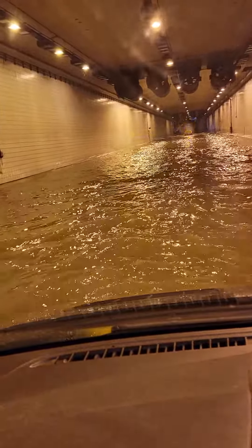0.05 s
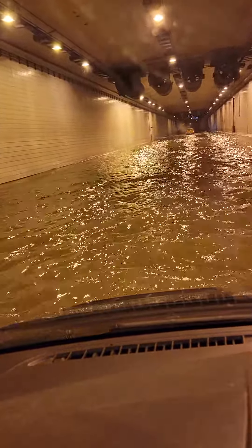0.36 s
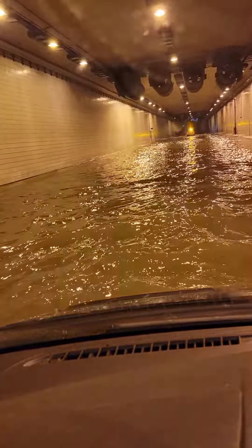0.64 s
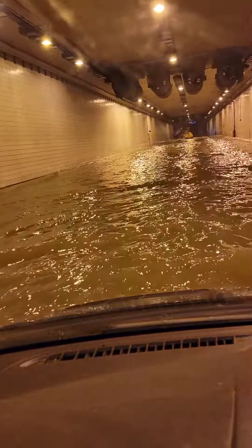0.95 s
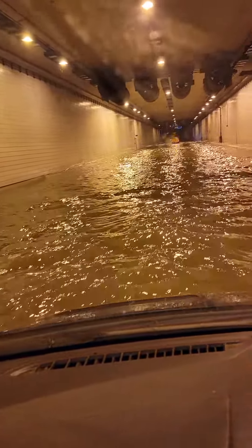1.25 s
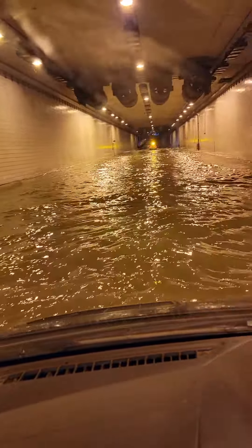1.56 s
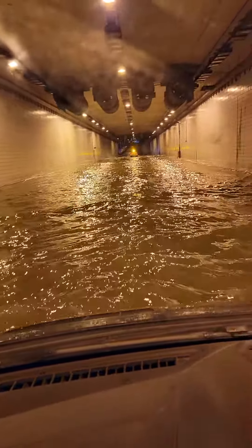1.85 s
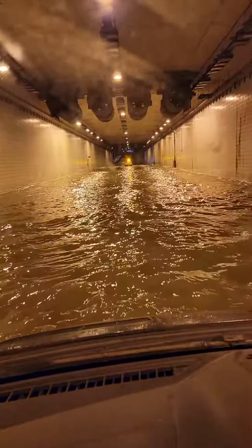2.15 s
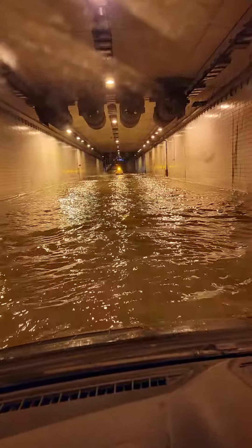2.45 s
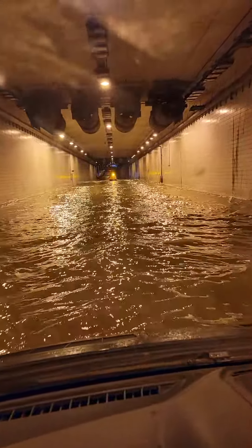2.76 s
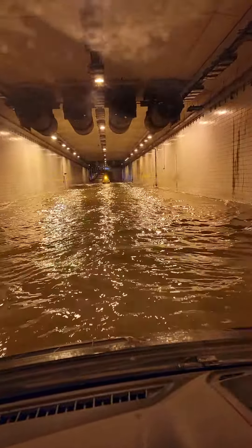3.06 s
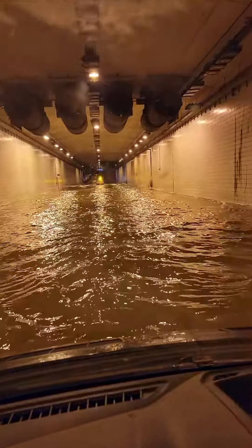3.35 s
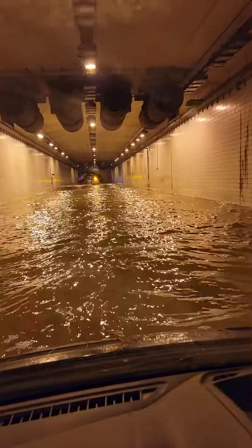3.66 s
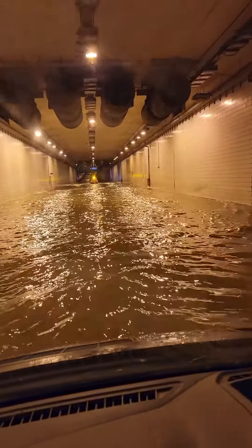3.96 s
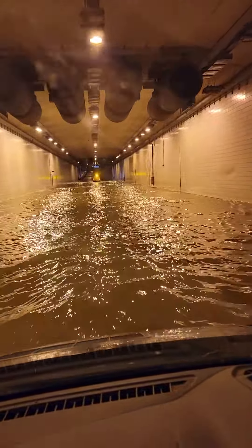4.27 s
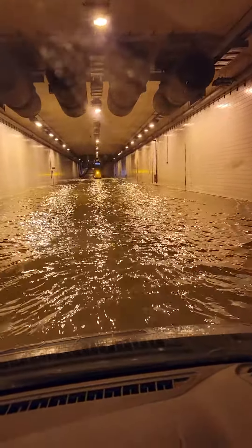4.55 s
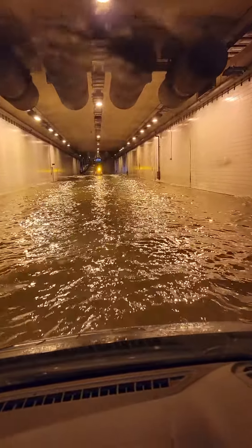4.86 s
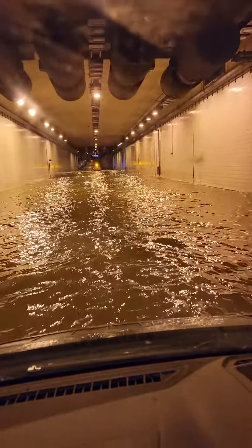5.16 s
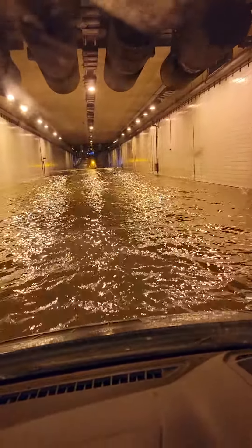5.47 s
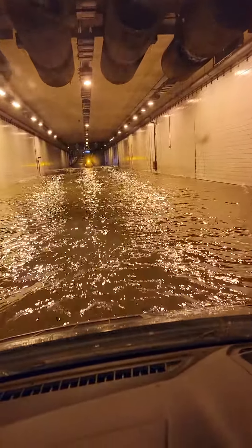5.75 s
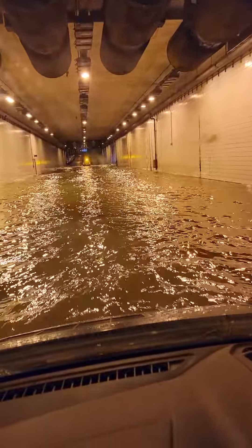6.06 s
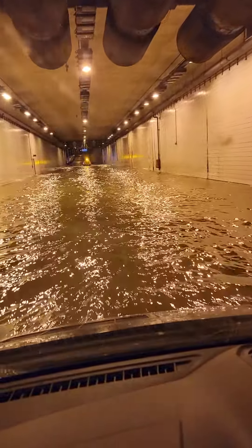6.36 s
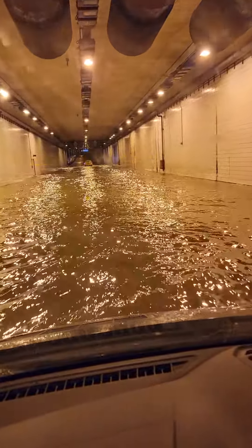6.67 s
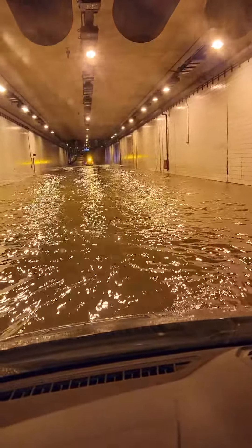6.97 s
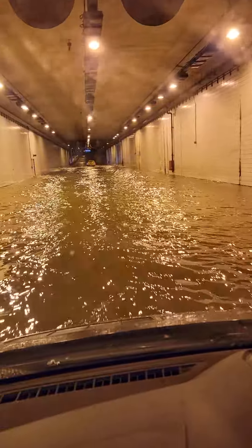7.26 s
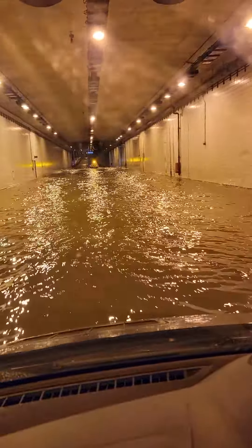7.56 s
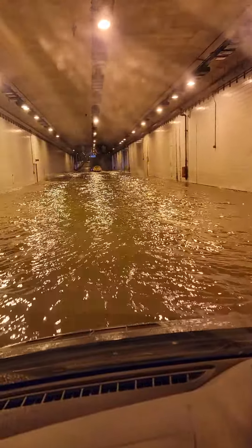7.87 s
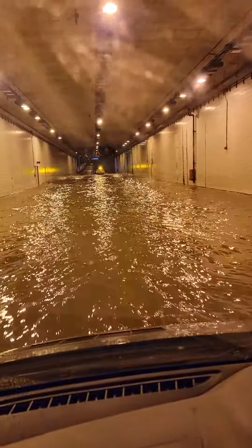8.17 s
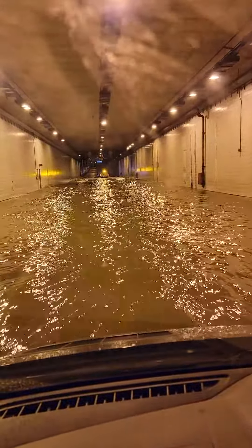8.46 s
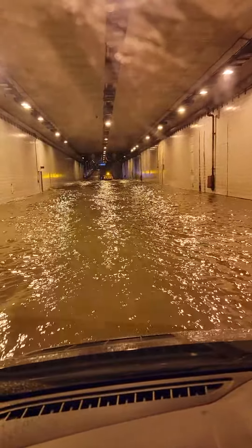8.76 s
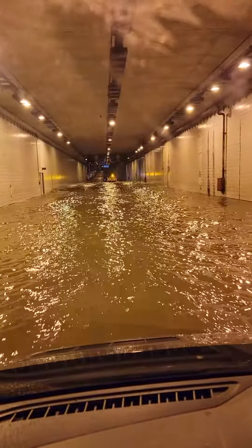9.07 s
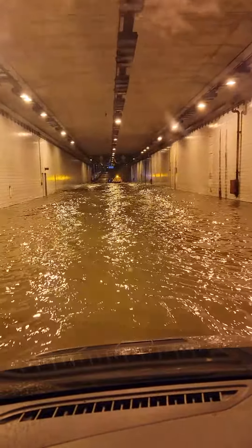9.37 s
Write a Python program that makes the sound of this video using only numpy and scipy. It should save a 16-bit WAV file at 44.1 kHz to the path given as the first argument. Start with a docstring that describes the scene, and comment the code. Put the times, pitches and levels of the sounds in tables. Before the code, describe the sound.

From inside a car wading slowly through a flooded tunnel, a deep engine boom runs for the whole nine and a half seconds. The revs climb slightly until about 3 seconds, hold, then ease a little after 6, while a low hum swells and fades. Water rumbles against the shell, churns under the floor and washes along the doors, building modestly by 4 seconds, with gentle surges near 1.8, 3, 4, 5.7, 8 and 8.8 seconds. The turn signal goes tick-tock in the dashboard throughout, one pair about every three quarters of a second. Close on the right, something rubs with a soft, airy swish, clearest around 4 seconds and again at the very end. Small crisp crackles cluster between 1 and 2 seconds and around 3.5, with single ones near 5 and 7. The cabin sounds close, enclosed and bass-heavy.

```python
"""A four-cylinder engine booms at low revs and picks up a little, heard inside a car wading slowly
through a flooded tunnel. Its firing tone and overtones swell as they pass through the cabin's modes.
Water shakes the shell, churns under the floor and washes along the doors, and the flasher relay
goes tick-tock in the dashboard. Close on the right something rubs softly, with a few crackles."""
import sys
import numpy as np
from scipy import signal
from scipy.fft import rfft, irfft, next_fast_len
from scipy.io import wavfile

SR = 44100
rng = np.random.default_rng(int(sys.argv[2]) if len(sys.argv) > 2 else 0)


def to_wav(s):
    """Save 16-bit WAV."""
    ch = np.atleast_2d(s).T  # columns
    pcm = np.round(np.clip(ch, -1, 1) * 32767)  # PCM
    wavfile.write(sys.argv[1], SR, pcm.astype(np.int16))


N = 415422
TIME = np.arange(N) / SR


def from_db(db):
    """Decibels to gain."""
    return 10 ** (np.asarray(db) / 20)


def rms_one(x):
    """Scale to unit power."""
    return x / np.sqrt(np.mean(x ** 2) + 1e-20)


def in_time(rows):
    """Each column of an automation curve at every sample."""
    times, *columns = np.transpose(rows)
    return [np.interp(TIME, times, column) for column in columns]


def at_hz(points, hz):
    """Read a curve on a log-frequency axis."""
    freqs, values = np.transpose(points)
    return np.interp(np.log(hz + 1e-9), np.log(freqs), values)


def pan(db):
    """Stereo gains for a pan in dB, left minus right."""
    return rms_one(from_db(np.array([[db], [-db]]) / 2))


def delayed(pair, lags_s):
    """Delay each side by its own time."""
    return np.array([np.pad(x, (int(lag * SR), 0))[:len(x)] for x, lag in zip(pair, lags_s)])


def hump(peak_s, half_s):
    """A smooth rise to 1 and a fall, with soft skirts."""
    return 1 / np.cosh(np.minimum(np.abs((TIME - peak_s) / half_s) * np.sqrt(2), 20))


def drift(rate_hz):
    """Slow random modulation of unit power."""
    hop = 40
    pole = np.exp(-2 * np.pi * rate_hz * hop / SR)
    noise = rng.standard_normal(N // hop + 2002)
    slow = signal.lfilter([1], [1, -2 * pole, pole * pole], noise)[2000:]
    return np.interp(np.arange(N) / hop, np.arange(len(slow)), rms_one(slow))


def ring(force, hz, t60):
    """A resonator: a unit click sets a sine of height 1 ringing."""
    radius, angle = from_db(-60 / (t60 * SR)), 2 * np.pi * hz / SR
    return signal.lfilter([0, np.sin(angle)], [1, -2 * radius * np.cos(angle), radius ** 2], force + 1e-18)


def mounted_ring(force, hz, t60):
    """A mode driven through a mount of the same tuning: it builds quickly to height 1, then dies."""
    return ring(ring(force, hz, t60), hz, t60) * 2 * np.e * np.log(1000) / (t60 * SR)


def hiss():
    """Two unrelated white noises."""
    return rng.standard_normal((2, N))


def grains(per_s, spread_db):
    """Two trains of random clicks, most small and a few large."""
    sizes = from_db(spread_db * np.minimum(rng.exponential(1, (2, N)), 4))
    signs = rng.choice([-1, 1], (2, N))
    return rms_one(sizes * signs * (rng.random((2, N)) < per_s / SR))


# Stereo width of the cabin: freq_hz, left_right_correlation
CABIN_CORRELATION = [(30, 0.73), (170, 1), (240, 0.85), (310, 0.42), (380, -0.012), (460, -0.15),
                     (550, -0.56), (660, -0.061), (780, -0.7), (950, -0.37), (1550, -0.54), (2000, -0.0055),
                     (2700, -0.14), (5000, 0.007)]
# Lean of the stereo image: freq_hz, pan_db
CABIN_BALANCE = [(40, -3), (90, -0.5), (160, 0), (260, 4), (350, 1.5), (550, -1), (1200, -2), (3000, -2),
                 (4500, -1), (6500, -6.5), (9000, 5.5), (14000, -5)]
def in_cabin(pair, eq):
    """Shape two unrelated signals into a unit-power stereo bed with the cabin's width and balance."""
    size, sides = next_fast_len(N), np.array([[1], [-1]])
    hz = np.arange(size // 2 + 1) * SR / size
    mid, side = rfft(pair, size) * from_db(at_hz(eq, hz))
    alike = np.clip(at_hz(CABIN_CORRELATION, hz), -1, 1)
    field = np.sqrt(1 + alike) * mid + np.sqrt(1 - alike) * side * sides
    field *= from_db(sides * at_hz(CABIN_BALANCE, hz) / 2)
    return rms_one(irfft(field, size)[:, :N])


# Bright, airy tone of the rub: freq_hz, gain_db
RUB_EQ = [(1500, -22), (3000, -5), (3900, 0), (4900, 1.5), (5830, 1.5), (5960, 7), (6080, 1.5), (6700, .5),
          (7500, -3.5), (8400, -8.5), (10500, -5), (12500, .5), (15000, 2), (16000, 1)]
# Light contact between strokes: time_s, relative_db
RESTING_CONTACT = [(0, -79), (1, -79), (4.5, -73), (9.42, -68.5)]
# Strokes that swell and fade: peak_s, relative_db, half_length_s
RUB_STROKES = [(1.158, -70, 0.036), (1.322, -66, 0.16), (1.665, -65, 0.13), (1.896, -57.5, 0.019),
               (2.714, -71, 0.15), (3.0, -71.5, 0.11), (3.5, -65, 0.054), (3.758, -62, 0.057),
               (3.88, -50.5, 0.091), (3.943, -48, 0.07), (4.09, -55.5, 0.083), (4.477, -65, 0.12),
               (4.654, -63, 0.11), (5.395, -58.5, 0.13), (5.787, -69, 0.11), (6.24, -67.5, 0.077),
               (6.596, -68.5, 0.18), (7.383, -63.5, 0.074), (7.867, -59, 0.09), (8.07, -65, 0.033),
               (9.276, -58, 0.086), (9.36, -51, 0.053)]
def rubbing(gain_db=8.0, grit=0.61, uneven_db=1.9):
    """Fine slips of a surface sliding close by make a swish that swells with each stroke."""
    slips = hiss() + grit * grains(1500, spread_db=2.5)
    power = from_db(in_time(RESTING_CONTACT)[0]) ** 2
    power += sum((from_db(db) * hump(peak_s, half_s)) ** 2 for peak_s, db, half_s in RUB_STROKES)
    envelope = np.sqrt(power) * from_db(gain_db + uneven_db * drift(12))
    return envelope * in_cabin(slips, RUB_EQ) * pan(-3.0)


# A crackle's crisp snap and the midrange body under it: freq_hz, gain_db
SNAP_EQ = [(800, -14), (2000, -7), (5500, 2.5), (7000, 2), (9000, -3), (12500, 1), (14500, -2), (16000, -6)]
BODY_EQ = [(600, -28), (1500, 6), (3000, -1.5), (4500, 0), (8000, -31)]
# Small close catches: start_s, level_db, twice_pan_db, body_over_snap_db
CATCHES = [(1.1195, -35.5, -1.5, -32), (1.311, -40, -9, -21), (1.6195, -41.5, -9, 12.5),
           (1.67, -39, -16, -15), (1.7, -47, -3, -20), (1.7409, -48, -17, -20), (1.7988, -39, -18, -11),
           (1.8255, -47, -10, -15), (1.8377, -47, -7, -12), (1.8776, -43, -9, -15), (1.899, -44, -17, 8),
           (2.1055, -42, -19, -20), (3.4018, -48, -15, 21.5), (3.412, -42, -10, -10), (3.428, -51, -9, -15),
           (3.5436, -51, -14, 15), (3.658, -43, -19, -32), (3.677, -37, -16, -8), (3.684, -40, -16, -2),
           (3.6985, -45, -14, -2), (3.7153, -35.5, -20, 8), (5.0335, -37, -2, -22), (7.0183, -40, -3, -25)]
def crackles(slips_per_s=300, slips_db=-8, slips_s=0.013, scratch=0.1, scratch_s=0.018):
    """The rubbing surface catches: a snap, a dying run of finer slips and a short scratch."""
    attack_s, decay_s = .00015, .0007
    snap, body, t = np.zeros((2, N)), np.zeros((2, N)), TIME[:SR // 25]
    for start_s, db, twice_pan_db, body_db in CATCHES:
        slips = (rng.random(len(t)) < slips_per_s / SR) * rng.random(len(t))
        slips *= from_db(slips_db) * np.exp(-t / slips_s)
        slips[0] = 1  # the opening snap
        shape = signal.lfilter([1], [1, -np.exp(-1 / (decay_s * SR))], slips)
        shape += scratch * np.exp(-t / scratch_s)
        burst = from_db(db) * shape * (1 - np.exp(-t / attack_s)) * pan(twice_pan_db / 2)
        start = int(start_s * SR)
        snap[:, start:start + len(t)] += burst
        body[:, start:start + len(t)] += from_db(body_db) * burst
    return snap * in_cabin(hiss(), SNAP_EQ) + body * in_cabin(hiss(), BODY_EQ)


# Early reflections off windscreen, roof and doors: left_delay_s, right_delay_s, relative_db
REFLECTIONS = [(.0085, .0073, -15), (.0105, .0098, -12), (.0166, .0135, -19), (.0225, .0213, -19),
               (.0271, .034, -24)]
def cabin_echoes(direct):
    """The cabin answers briefly, its upholstery soaking up the treble."""
    dull = signal.sosfilt(signal.butter(2, 2800, fs=SR, output="sos"), direct)
    return sum(from_db(db) * delayed(dull, lags_s) for *lags_s, db in REFLECTIONS)


# The relay pulls in (tick) and drops out (tock): start_s, relative_db
TICK_STROKES = [(.4358, -2), (1.1957, -3), (1.9432, -1.5), (2.7167, -3.5), (3.4631, -2.5), (4.2231, -3),
                (4.9836, -2), (5.7433, -2), (6.5163, -2.5), (7.2759, -1.5), (8.0242, -2.5), (8.7834, -4.5)]
TOCK_STROKES = [(.1222, -0.7), (.8871, -0.44), (1.6471, -0.31), (2.424, 0.38), (3.1672, 0), (3.9211, -1.1),
                (4.681, -0.67), (5.4412, -0.086), (6.2018, .5), (6.9682, 0.13), (7.7434, .5),
                (8.4814, -0.81), (9.2422, -0.39)]
# The ring of each stroke: pitch_hz, relative_db, t60_s, pan_db
TICK_RING = [(594, -20.5, 0.02, -3.5), (785, -25.5, 0.014, 3), (1587, -47, 0.014, -5),
             (1987, -33.5, 0.014, -6), (2120, -38.5, 0.016, -17.5), (2640, -52, .013, -4),
             (2910, -47.5, 0.016, -11), (3600, -48.5, .014, -8.5), (4970, -50.5, 0.02, -9.5),
             (5210, -52.5, 0.02, -8.5), (5610, -54, 0.017, -11.5)]
TOCK_RING = [(599, -25.5, .02, -2.5), (795, -24.5, 0.014, -3.5), (923, -35.5, .016, 9),
             (2200, -46.5, 0.012, -12), (2555, -38, 0.01, -10), (2950, -51.5, .011, -9.5),
             (3990, -42, 0.011, -11), (4140, -47, .01, -7), (4680, -56, .014, -7), (4990, -53, 0.019, -2.5),
             (5480, -48, 0.013, -12), (5690, -49, 0.014, -10)]
def relay(strokes, modes, gain_db, bounce, echo_db, crack_db, dash_lag_s):
    """The armature hits with a dry crack and bounces; low dashboard modes beat into a double knock."""
    dash_below_hz, bounce_s, crack_s = 1100, .0044, .003
    size, out = SR // 10, np.zeros((2, N + SR))
    crack_band = signal.butter(4, (1300, 6500), "band", fs=SR, output="sos")
    for start_s, db in strokes:
        crack = signal.sosfilt(crack_band, rng.standard_normal((2, size)))
        direct = from_db(crack_db) * crack * np.exp(-TIME[:size] / crack_s) * pan(-6)
        for k, (hz, mode_db, t60, pan_db) in enumerate(modes):
            force = np.zeros(size)
            hit = int(dash_lag_s * SR) if hz < dash_below_hz else 0
            force[hit] = (-1) ** k * from_db(mode_db + rng.normal(0, 0.92))
            rebound = hit + int((bounce_s + rng.normal(0, 1e-4)) * SR)
            force[rebound] = bounce * force[hit] * (hz > dash_below_hz)
            direct += mounted_ring(force, hz * (1 + rng.normal(0, 0.0096)), t60) * pan(pan_db)
        direct = delayed(direct, (.0007, 0))  # the left side is farther away
        stroke = direct + from_db(echo_db) * cabin_echoes(direct)
        start = int(start_s * SR)
        out[:, start:start + size] += from_db(db + gain_db) * stroke
    return out[:, :N]


# Brief pitched swells in the churning water: peak_s, pitch_hz, level_db, pan_db
WATER_SWELLS = [(0.331, 216, -34, 2), (0.889, 248, -32.5, 5), (1.769, 202, -28.5, 1),
                (3.042, 199, -34.2, -3), (3.673, 194, -39, -1), (4.067, 325, -38, 8), (4.125, 281, -31, 7),
                (4.744, 290, -33.5, 1), (5.297, 867, -44, 5), (5.497, 322, -32, 6), (5.501, 219, -37, 2),
                (5.578, 775, -43.9, -3), (5.646, 252, -37, 9), (5.768, 210, -35, -1), (5.796, 382, -34, -4),
                (7.088, 296, -36, 6), (7.274, 194, -37, 3), (7.805, 328, -33, 7), (8.1, 603, -34, 2),
                (8.109, 790, -46, 1), (8.943, 444, -35, -6), (8.989, 263, -34.5, 5)]
def water_swells(half_cycles=4.3, rise_per_s=0.49):
    """Short tones swell out of the churn, each lasting a few cycles and rising slightly in pitch."""
    out, t = np.zeros((2, N + SR)), np.arange(-SR // 8, SR // 8) / SR
    for peak_s, hz, db, pan_db in WATER_SWELLS:
        stereo_phase = np.array([[0], [np.arccos(np.clip(at_hz(CABIN_CORRELATION, hz), -1, 1))]])
        phase = 2 * np.pi * (hz * t * (1 + rise_per_s * t / 2) + rng.random()) + stereo_phase
        envelope = np.sqrt(2) * from_db(db) * np.exp(-(t * hz / half_cycles) ** 2)
        start = int((peak_s + t[0]) * SR)
        out[:, start:start + len(t)] += envelope * np.sin(phase) * pan(pan_db)
    return out[:, :N]


def bubbles(per_s, low_hz, high_hz, cycles, count=16):
    """A swarm of small bubbles: each collapse rings for a few cycles at one of a set of pitches."""
    clicks, voice = grains(per_s, spread_db=2.5), rng.integers(0, count, N)
    pitches = np.geomspace(low_hz, high_hz, count)
    return rms_one(sum(hz * ring(clicks * (voice == k), hz, cycles / hz) for k, hz in enumerate(pitches)))


# Water layers, from deep shell rumble up to fizzy spray: freq_hz, gain_db
RUMBLE_EQ = [(10, -27), (17, -3.5), (27, -1), (46, -1.5), (56, 6.5), (68, 0), (79, 4.5), (88, -3), (98, 0),
             (112, -4.5), (130, -2.5), (158, -4.5), (180, -16), (230, -30.5), (400, -72.5)]
CHURN_EQ = [(100, -16.5), (150, -11), (185, -0.5), (215, -0.5), (250, -3), (310, -2.5), (380, -2.5),
            (450, -6.5), (560, -6), (680, -11), (800, -9.5), (950, -15), (1400, -32), (3000, -64)]
WASH_EQ = [(500, -51), (800, 4.5), (1000, 1), (1250, 3), (1600, -2.5), (2000, -10), (2500, -31),
           (4000, -49)]
SPRAY_EQ = [(1200, -12), (1900, 5), (2400, 2.5), (2900, 5.5), (3300, 3.5), (4100, -5), (5000, -8.5),
            (6000, -11), (6650, -8), (7400, -15.5), (8200, -28), (10500, -47), (13000, -27.5),
            (16000, -46.5)]
# Fader ride on the shell rumble: time_s, level_db
RUMBLE_RIDE = [(0, -24.5), (1.5, -28.5), (2.4, -26.5), (3, -24), (6, -22), (9.42, -24)]
# The bow wave builds as the car gathers way: time_s, churn_db, spray_db
BOW_WAVE_RIDE = [(0, -37, -52), (2.3, -35.5, -52), (4.3, -33.5, -49), (7, -33.5, -48), (9.42, -33.5, -46.5)]
# Single waves slap the body: peak_s, churn_boost_db, wash_boost_db, spray_boost_db
WAVE_SLAPS = [(1.76, 0.069, -1.5, 0.5), (3.03, 1.2, 0, 0.5), (3.85, -0.84, 1.5, 4), (4.12, 0.27, 1, 0.5),
              (5.72, 1.1, -0.5, 0), (8.07, 1.5, 1.8, 0.5), (8.83, -0.072, 4, 2)]
def water(wash_base_db=-47.0, wash_follows=0.39, slap_half_s=0.12, gurgle=0.23, splash=0.28, fizz=0.34):
    """The bow wave shakes the shell, gurgles under the floor and splashes along the doors."""
    churn_db, spray_db = in_time(BOW_WAVE_RIDE)
    wash_db = wash_base_db + wash_follows * (spray_db - spray_db.mean())
    slaps_db = sum(np.outer(boosts, hump(peak_s, slap_half_s)) for peak_s, *boosts in WAVE_SLAPS)
    churn_db, wash_db, spray_db = np.array([churn_db, wash_db, spray_db]) + slaps_db
    surge_db = .5 * drift(13)  # wash and spray surge together
    rumble = from_db(in_time(RUMBLE_RIDE)[0] + drift(11)) * in_cabin(hiss(), RUMBLE_EQ)
    churn_db += .5 * drift(1.8)
    churn = from_db(churn_db) * in_cabin(hiss() + gurgle * bubbles(1200, 175.3, 719, cycles=8.3), CHURN_EQ)
    wash = in_cabin(hiss() + splash * bubbles(3000, 686, 2400, cycles=11), WASH_EQ)
    spray = in_cabin(hiss() + fizz * grains(2500, spread_db=5.0), SPRAY_EQ)
    return rumble + churn + from_db(wash_db + surge_db) * wash + from_db(spray_db + surge_db) * spray


# Fader ride on the drone: time_s, level_db
DRONE_RIDE = [(0, -62), (1.55, -43), (1.75, -32.5), (2.3, -30), (3.1, -43.5), (4.5, -30.5), (4.8, -56),
              (5.2, -27), (5.6, -42), (6.1, -32.5), (6.8, -28.5), (7.25, -50), (7.7, -34.5), (8.2, -30),
              (8.65, -40), (9.0, -27), (9.42, -42.5)]
def drone(pitch_hz=121.3):
    """A low hum beside the engine swells and fades at a nearly steady pitch."""
    return np.sqrt(2) * from_db(in_time(DRONE_RIDE)[0]) * np.sin(2 * np.pi * pitch_hz * TIME + drift(2))


# Rev curve: time_s, firing_hz
REVS = [(0, 32.9), (.3, 33.0), (.55, 33.9), (.8, 35.6), (1.3, 36.0), (1.9, 35.6), (2.3, 37.0), (2.7, 38.2),
        (3.1, 39.4), (3.8, 39.8), (4.3, 39.5), (5.3, 39.7), (5.85, 39.9), (6.4, 39.0), (7.1, 39.0),
        (8, 38.1), (8.7, 37.4), (9.42, 37.5)]
# Cabin resonances, one for each engine order: order, centre_hz, half_width_hz, peak_db
BOOM_MODES = [(1, 38.92, 2.3, -15.5), (2, 66.1, 7.14, -23.5), (3, 110, 4.1, -40), (4, 144.34, 9.4, -28)]
# The engine shudders or eases: peak_s, boom_boost_db, octave_boost_db, two_octave_boost_db, half_length_s
ENGINE_SHUDDERS = [(0.244, 1.5, 4.5, -4, 0.13), (.471, -2, -17.5, 7.5, 0.039), (0.628, 4, 8.5, -10, 0.06),
                   (1.42, -2, -1, 2, 0.09), (2.047, 1, 1, 0.5, .15), (2.54, 0, 0, 5, .11),
                   (2.68, -5.5, -6, 0, .04), (2.83, 2, 0, 3, .11), (3.272, -3.5, 0, -3, .06),
                   (3.935, -4.5, 0, -1, 0.039), (4.137, 1, -3, 7.5, 0.055), (4.47, 1.5, -4, 9, 0.085),
                   (4.973, 0.5, 8.5, -3, 0.061), (5.787, 4, -5, 9.5, 0.066), (6.577, -2.5, -3, 7, 0.09),
                   (6.78, -1, 5.5, -2, .06), (7.054, 0, 3, 5, 0.074), (7.421, 1.5, -7, 1.5, 0.048),
                   (8.127, 0, 4, 2, .08), (8.378, -1.5, -2, -14, 0.055), (8.547, -1, -4, 6.5, 0.034),
                   (8.74, 1, -11, -7.5, 0.097), (8.993, -0.5, 0, 5, 0.11), (9.38, 1.5, -0.5, -12.5, .09)]
def engine(boom_rough=0.015, load_rough=0.11, waver_db=0.43, waver_db_per_hz=0.5, steady_below_hz=34.3):
    """Firing tone and overtones boom as the revs cross cabin modes; uneven firings make them flutter."""
    firing_hz, = in_time(REVS)
    phase = 2 * np.pi * np.cumsum(firing_hz) / SR
    boom, second, third, fourth = [from_db(db) / (1 + ((order * firing_hz - hz) / width) ** 2)
                                   for order, hz, width, db in BOOM_MODES]
    shudder_db = sum(np.outer(boosts, hump(peak_s, half_s)) for peak_s, *boosts, half_s in ENGINE_SHUDDERS)
    boom, second, fourth = np.array([boom, second, fourth]) * from_db(shudder_db)
    boom = boom * from_db(waver_db * drift(3.2)) * (1 + boom_rough * drift(18))
    lags_s = np.array([[0], [.0014]])  # the boom reaches the right side later and stronger
    tone = boom * np.sin(phase - 2 * np.pi * firing_hz * lags_s) * pan(-2.8)
    # the overtones waver and roughen as the revs climb
    excess_hz = np.maximum(firing_hz - steady_below_hz, 0)
    rough = load_rough * np.clip(excess_hz / excess_hz.max(), .3, 1)
    for order, level in enumerate((second, third, fourth), 2):
        overtone = np.sin(order * phase) * (1 + rough * drift(13.5))
        overtone += rough * drift(40) * np.cos(order * phase)
        tone += level * from_db(waver_db_per_hz * excess_hz * drift(3.15)) * overtone * pan(-2.7)
    return np.sqrt(2) * tone


def scene():
    """The mix inside the cabin."""
    tick = relay(TICK_STROKES, TICK_RING, gain_db=2.0, bounce=0.04,
                 echo_db=-1, crack_db=-43, dash_lag_s=.0005)
    tock = relay(TOCK_STROKES, TOCK_RING, gain_db=-1.5, bounce=0.61,
                 echo_db=-4, crack_db=-41.5, dash_lag_s=.00046)
    return engine() + drone() + water() + water_swells() + tick + tock + rubbing() + crackles()


def record(dry):
    """A steep low-pass takes off the very top."""
    return signal.sosfilt(signal.ellip(12, .1, 80, 15900, fs=SR, output="sos"), dry)


dry = scene()
out = record(dry)
to_wav(out)
```